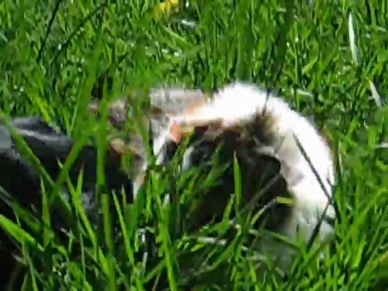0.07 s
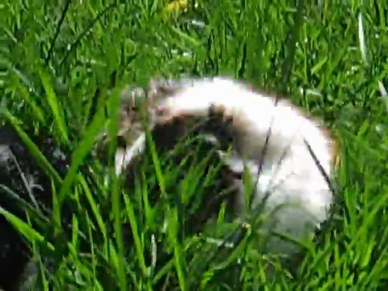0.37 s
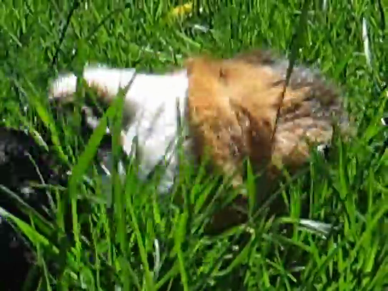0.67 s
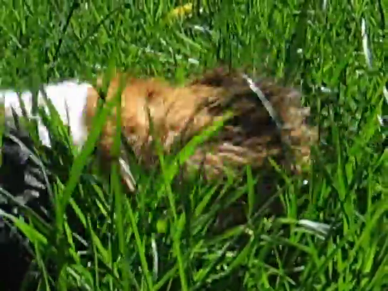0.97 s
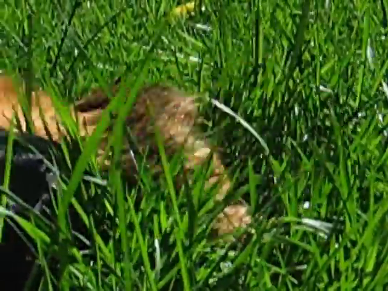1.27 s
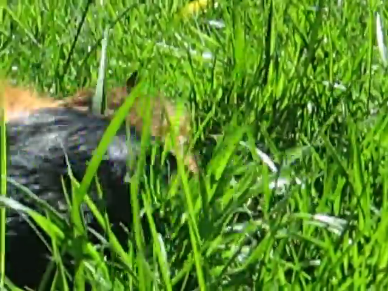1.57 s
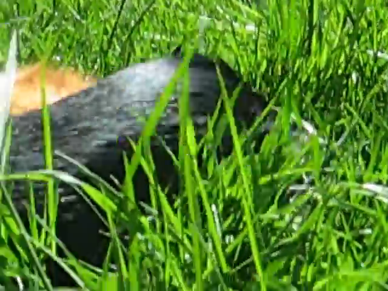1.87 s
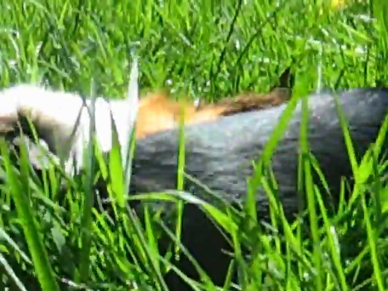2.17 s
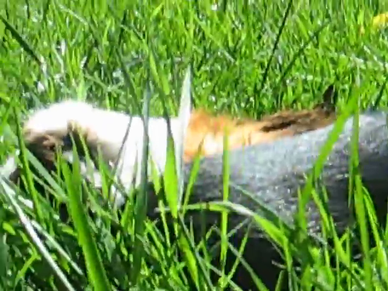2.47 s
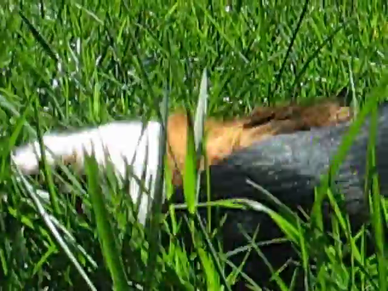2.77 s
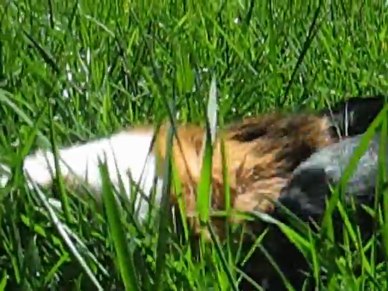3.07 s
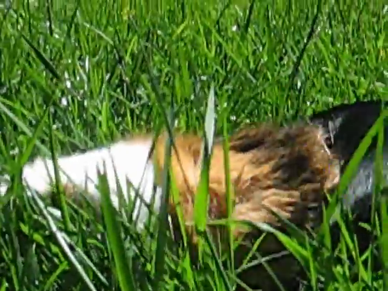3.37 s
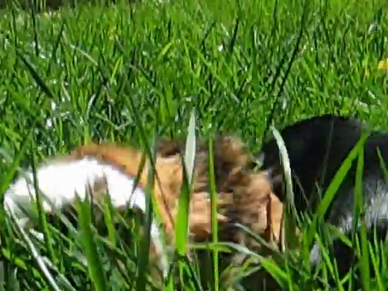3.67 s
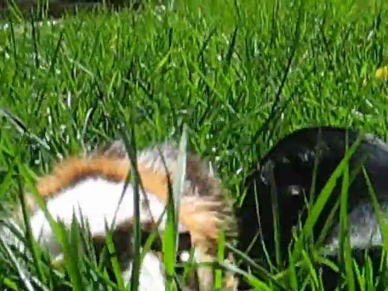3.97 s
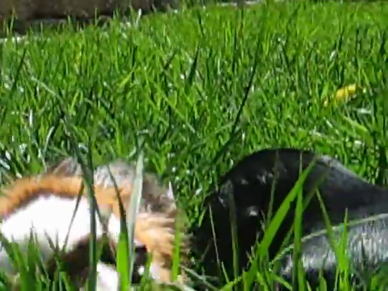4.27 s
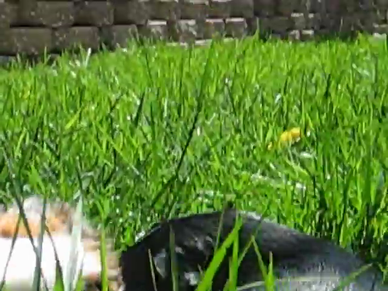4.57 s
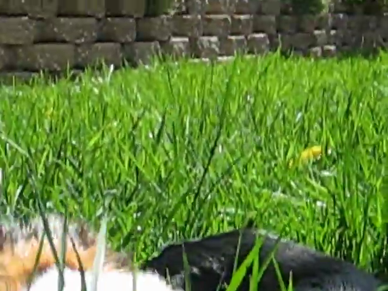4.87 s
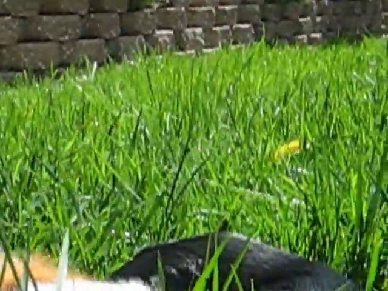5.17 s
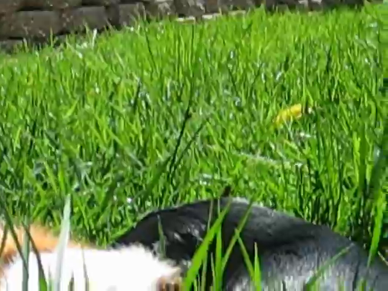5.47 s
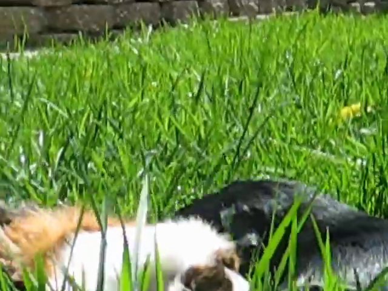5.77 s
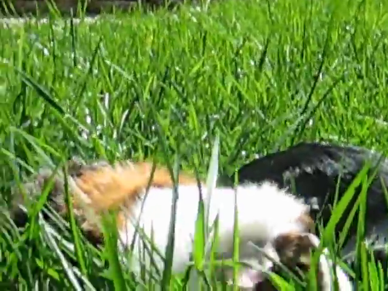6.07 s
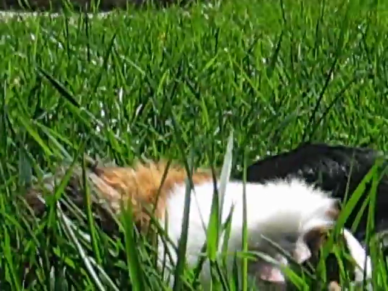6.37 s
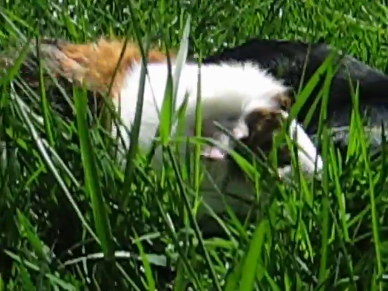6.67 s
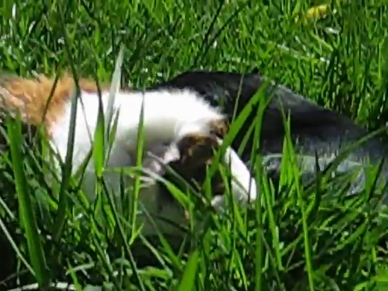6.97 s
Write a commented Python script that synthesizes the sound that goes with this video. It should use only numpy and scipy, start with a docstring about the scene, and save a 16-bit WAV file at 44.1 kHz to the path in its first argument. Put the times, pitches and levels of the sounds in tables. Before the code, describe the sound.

Guinea pigs move through long grass close to the microphone, making soft, short chuts in the first half and tiny rising squeaks throughout. Blades rustle and sometimes snap, while gusts and handling bumps rumble on the microphone. A distant bird whistles faintly at the start and again later. Near the end something rubs close by, and one hard knock on the camera stands out as the loudest sound.

```python
"""Guinea pigs in long grass, close to the microphone of a small, faintly whining camera, in gusty wind.
At first a distant bird whistles twice, echoing off a garden wall, and a low hum dies away by 2 s.
Up close the animals voice soft arched chuts until about 3.7 s and quick upward squeaks throughout;
blades rustle and snap as they push through, and the camera is bumped in the hand. From 5 s the bird
calls again, something rubs close by the microphone, and at 6.4 s a hard knock rings the camera case."""
import sys
import numpy as np
from scipy import signal
from scipy.fft import rfft, irfft
from scipy.io import wavfile

SR = 44100
rng = np.random.default_rng(int(sys.argv[2]) if len(sys.argv) > 2 else 0)


def pcm_store(signal):
    """Save signal as 16-bit PCM."""
    levels = np.round(np.clip(np.atleast_2d(signal), -1, 1) * 32767)
    wavfile.write(sys.argv[1], SR, levels.astype(np.int16).T)


N = 313551
T = np.arange(N) / SR
FLICK_HZ, FLICK_S = 1376, .019  # calls close with a flick toward this pitch; its full length in a chut

# close chuts: (time [s], arch length [s], crest pitch [Hz], voiced share of the flick [0-1],
# relative level [dB], nasal edge [dB])
CHUTS = [(0.771, .016, 617, 0.06, -41, -3), (1.072, .034, 562, 1, -39.5, 0),
         (1.230, 0.03, 582, 1, -36.5, 1), (1.399, 0.037, 574, 0.64, -39.5, 6),
         (1.583, 0.026, 541, 0.95, -41.5, -8), (1.796, 0.031, 587, 1, -44.5, -9),
         (1.995, 0.028, 514, 1, -40.5, 3), (2.077, 0.035, 591, 0.97, -34.5, 1),
         (2.171, 0.012, 493, 0, -34, -14), (2.241, 0.047, 614, 0.88, -34.5, 1),
         (2.52, 0.022, 454, 1, -39.5, -11), (2.581, 0.046, 601, 0.77, -35, -0.5),
         (2.733, .049, 621, 1, -34, -14), (2.909, .046, 640, 0.65, -35, -4),
         (3.222, 0.036, 672, .7, -44, -16), (3.477, 0.036, 629, 0.8, -35.5, 1.5),
         (3.624, 0.04, 574, 0.95, -36, 5)]
# close squeaks: (time [s], length [s], start pitch [Hz], relative level [dB], nasal edge [dB])
SQUEAKS = [(.002, 0.015, 610, -40.5, 8), (0.339, 0.024, 476, -33.5, 1), (0.561, 0.019, 570, -46, 4),
           (0.649, 0.014, 647, -43, 5), (0.793, 0.02, 586, -35, 2.5), (.942, .019, 578, -44, 0),
           (1.675, 0.043, 708, -43.5, -16), (1.876, 0.042, 786, -38, 3), (3.058, 0.028, 697, -44, -7),
           (3.343, 0.016, 658, -38, -5), (3.433, 0.019, 415, -38, -4), (3.819, 0.034, 414, -43.5, 0),
           (4.284, 0.0139, 800, -33, 5.5), (4.35, 0.011, 783, -36.5, 7), (4.705, 0.012, 905, -38.5, -5),
           (5.047, .015, 800, -40, 4), (5.702, 0.018, 627, -42.5, -4), (6.015, 0.021, 587, -34, -10),
           (6.847, 0.021, 730, -37, -5)]
# resonances of throat and nose: (frequency [Hz], gain [dB])
THROAT = [(300, 5), (600, -4.5), (900, -3), (1220, -2), (1450, -11.5), (1750, -25), (2100, -22.5),
          (2450, -13.5), (2900, -13), (3300, -21), (4500, -34.5)]
# soft clucks and pats in the grass: (time [s], level [dB])
PATS = [(.339, -27), (.490, -29), (.535, -32), (.800, -27.5), (.928, -32), (1.237, -40.5), (2.177, -29),
        (2.240, -38), (2.327, -34), (3.484, -32), (4.321, -27.5), (4.333, -36), (4.388, -28.5),
        (4.411, -32.5), (6.949, -25)]
# blades snapping: (time [s], peak level [dB])
SNAPS = [(1.9689, -33), (3.1708, -28), (3.644, -27), (3.686, -21.5), (5.142, -32), (5.158, -32.5)]
# an animal pushes through the blades: (time [s], length [s], level [dB])
PUSHES = [(0, 0.19, -50), (.37, 0.39, -46.5), (.9, 0.11, -48), (1.44, 0.37, -48.5), (1.84, 0.35, -49),
          (2.63, 0.17, -48), (2.8, 0.22, -51.5), (3.14, 0.15, -49), (3.65, .19, -48), (4.7, 0.066, -50.5),
          (5.12, .45, -48), (5.65, 0.27, -52), (6.48, 0.06, -51), (6.75, 0.13, -51)]
# something rubs close by the microphone: (time [s], length [s], level [dB])
RUBS = [(4.78, 1.7, -51.5), (5.99, 0.43, -39.5), (6.11, 0.14, -37.5), (6.48, 0.097, -35),
        (6.66, 0.042, -39), (6.77, 0.064, -36.5), (6.88, .1, -40.5)]
# dull brushing of grass: (frequency [Hz], gain [dB])
BRUSH_SPECTRUM = [(150, -4.5), (300, 7.5), (600, 2), (1050, 1.5), (1600, -3), (2200, -7.5), (3200, -15.5),
                  (4500, -21), (6000, -36)]
# fine rustle of grass: (frequency [Hz], gain [dB])
RUSTLE_SPECTRUM = [(800, -18), (1800, -5), (2400, -3.5), (3100, 0), (3800, -2), (4500, -1), (5200, -2),
                   (5900, -15.5)]
# a knock and soft finger taps on the camera: (time [s], relative level [dB], contact time [s])
KNOCKS = [(1.548, -18.5, 0.00056), (4.151, -19.5, 0.00085), (4.551, -19.5, 0.00054), (6.3921, -0.5, .00005),
          (6.43, -13, 0.00072), (6.4809, -7.5, 0.0008)]
# modes of the camera case: (frequency [Hz], gain [dB], t60 [s])
CASE_MODES = [(436, -23, 0.062), (705, -17, 0.034), (920, -15, 0.032), (1106, -13.5, 0.031),
              (1400, -13.5, 0.02), (1724, -3.5, 0.009), (3160, -9, 0.011), (3740, -5.5, 0.0073),
              (4460, -2.5, 0.0095), (4780, -4, 0.0041)]
# bumps through the camera body: (time [s], length [s], frequency [Hz], level [dB])
BUMPS = [(1.86, 0.26, 177, -36.5), (1.867, 0.2, 56.5, -21), (3.418, 0.03, 74.6, -17),
         (3.638, 0.086, 118, -25), (4.41, 0.062, 34, -17), (5.902, 0.034, 62.7, -13.5),
         (6.48, 0.0074, 187, -10.5)]
# gusts on the microphone: (time [s], length [s], level [dB])
GUSTS = [(0, 0.65, -37), (1.76, 0.4, -29.5), (3.93, .66, -32.5), (4.7, 0.42, -35.5), (5.2, 0.44, -43),
         (5.58, 0.47, -32), (5.89, .66, -29), (6.6, 0.25, -37), (6.94, 0.094, -30.5)]
# wind buffeting the microphone: (frequency [Hz], gain [dB])
BUFFET_SPECTRUM = [(20, -18.5), (45, -3), (70, -0.5), (100, -6), (150, -13.5), (220, -22), (350, -28.5),
                   (700, -47.5)]
# strength of the wind's slow sway: (time [s], relative level [dB])
SWAY_LEVEL = [(0, -32), (.8, -28.5), (1.1, -34.5), (1.6, -29.5), (2.4, -21.5), (2.65, -29), (2.9, -25),
              (3.2, -31), (3.85, -32), (4.45, -26.5), (4.93, -31), (5.17, -21.5), (5.35, -25.5),
              (5.68, -26.5), (5.9, -22.5), (6.6, -21), (7.0, -27)]
# rumble of that sway: (frequency [Hz], gain [dB])
SWAY_SPECTRUM = [(3, -9.5), (7, 3), (12, 7), (20, -3.5), (35, 3), (50, -16.5), (80, -53.5)]
# hush of open air: (frequency [Hz], gain [dB])
AIR_SPECTRUM = [(59, -24), (100, -5.5), (178, -9), (297, -12.5), (403, -21.5), (576, -23), (823, -21),
                (1030, -33), (1390, -26.5), (1960, -30), (2940, -27.5), (4900, -30.5), (5810, -45.5),
                (7550, -66), (12800, -120)]
# distant bird: (time [s], length [s], held pitch [Hz], relative level [dB])
WHISTLES = [(0.134, 0.092, 4610, -51), (0.437, 0.035, 4600, -47.5), (5.141, 0.1, 4680, -51),
            (5.425, 0.15, 4660, -49), (5.718, 0.089, 4660, -48), (6.01, 0.088, 4630, -48.5),
            (6.258, 0.077, 4590, -49)]
# low background hum: (time [s], pitch [Hz], level [dB])
HUM = [(0, 49.07, -33), (.6, 48.7, -31), (1.1, 48.6, -32), (1.6, 46.07, -33), (1.8, 45.6, -53),
       (2.0, 47.3, -90)]
# harmonics of the hum: (multiple of the pitch, gain [dB])
HUM_HARMONICS = [(1, 0), (2, -10), (4, -19)]
# tones of the camera's works: (frequency [Hz], rms level [dB])
WHINE = [(292, -58.5), (353, -60.5), (1411, -60), (1764, -66), (2094, -66), (3014, -64), (5512, -72)]


def chuts(rise_share=.6, onset_ratio=.55, dip_ratio=.82, onset_db=-9, dip_db=-5, gain_db=1):
    """A guinea pig near the microphone: the pitch arches, sags, then flicks up as the call closes."""
    out = np.zeros(N)
    for s, arch_s, crest_hz, voiced, db, nasal_db in CHUTS:
        marks = [0, rise_share * arch_s, arch_s, arch_s + FLICK_S]
        t = np.arange(0, arch_s + voiced * FLICK_S, 1 / SR)
        rise, sag, flick = (np.interp(t, span, [0, 1]) for span in zip(marks, marks[1:]))
        dip_hz = dip_ratio * crest_hz
        arch_hz = crest_hz * (1 - (1 - onset_ratio) * (1 - rise) ** 2)
        hz = arch_hz + (dip_hz - crest_hz) * sag ** 2 + (FLICK_HZ - dip_hz) * flick ** 2
        effort = np.interp(t, marks, undb([onset_db, 0, dip_db, 0])) * signal.windows.tukey(len(t), .1)
        add(out, s, voice(hz, effort, nasal_db) * undb(db + gain_db))
    return out


def squeaks(hz_per_db=22.5, usual_db=-39.5, gain_db=3):
    """The closing flick alone: one fast, swelling glide that stops short; louder ones climb higher."""
    out = np.zeros(N)
    for s, length, start_hz, db, nasal_db in SQUEAKS:
        progress = np.linspace(0, 1, int(length * SR))
        end_hz = FLICK_HZ + hz_per_db * (db - usual_db)
        hz = start_hz + (end_hz - start_hz) * progress ** 1.5
        swell = np.interp(progress, [0, .7, 1], [.3, 1, .8]) * signal.windows.tukey(len(hz), .25)
        add(out, s, voice(hz, swell, nasal_db) * undb(db + gain_db))
    return out


def voice(hz, envelope, nasal_db, jitter=.02, shimmer_db=2.5):
    """Slightly unsteady vocal folds; their harmonics glide through the fixed throat resonances."""
    wobble, flutter = (unit(band(rng.standard_normal(len(hz)), 30, 270)) for _ in range(2))
    phase = 2 * np.pi * np.cumsum(hz * (1 + jitter * wobble)) / SR
    k = np.arange(1, 9)[:, None]
    nasal = np.clip((k * hz - 1700) / 700, 0, 1)  # the nasal edge acts above 1700 Hz
    harmonics = response(k * hz, THROAT) * undb(nasal_db * nasal) * np.sin(k * phase)
    return harmonics.sum(axis=0) * envelope * undb(shimmer_db * flutter)


def pats(centre_hz=920, t60=.032, thud_hz=170, thud_db=-4, thud_t60=.02):
    """Short dull clucks down in the grass, each over a small low thud."""
    out, t = np.zeros(N), T[:SR // 20]
    thud = np.sin(2 * np.pi * thud_hz * t) * undb(thud_db - 60 * t / thud_t60)
    for s, db in PATS:
        cluck = band(noise_burst(t, t60), centre_hz * .55, centre_hz * 1.45)
        add(out, s, undb(db) * (cluck / np.abs(cluck).max() + thud))
    return out


def snaps(t60=.0065):
    """A nearby blade gives way with a bright tick."""
    out, t = np.zeros(N), T[:SR // 40]
    for s, db in SNAPS:
        tick = band(noise_burst(t, t60), 2600, 4900)
        add(out, s, undb(db) * tick / np.abs(tick).max())
    return out


def grass(grains_per_s=2500, grain_db=2, patchy_db=1.5, idle_brush_db=-51, idle_rustle_db=-55):
    """Blades slip over fur and camera in tiny grains: pushes mostly rustle, close rubs mostly brush."""
    push = swells(PUSHES, attack_s=.034, release_s=.064)
    rub = swells(RUBS, attack_s=.016, release_s=.068)
    brush = np.sqrt(undb(idle_brush_db) ** 2 + rub ** 2 + (undb(-6) * push) ** 2)
    rustle = np.sqrt(undb(idle_rustle_db) ** 2 + push ** 2 + (undb(-13) * rub) ** 2)
    out = np.zeros(N)
    for gain, spectrum in ((brush, BRUSH_SPECTRUM), (rustle, RUSTLE_SPECTRUM)):
        slips = (rng.random(N) < grains_per_s / SR) * rng.choice([-1, 1], N)
        sizes = undb(grain_db * np.minimum(rng.exponential(size=N), 6))
        out += colour(slips * sizes, spectrum) * gain * undb(patchy_db * drift(35))
    return out


def knocks(attack_s=.00018):
    """Each contact rings the camera case; a soft finger pushes longer and leaves the high modes still."""
    out, t = np.zeros(N), T[:SR // 10]
    ring = sum((-1) ** k * np.sin(2 * np.pi * hz * t) * undb(db - 60 * t / t60)
               for k, (hz, db, t60) in enumerate(CASE_MODES))
    ring *= 1 - np.exp(-t / attack_s)
    for s, db, contact_s in KNOCKS:
        push = np.hanning(int(contact_s * SR) + 3)
        add(out, s, undb(db) * np.convolve(ring, push / push.sum()))
    return out


def bumps():
    """Handling noise reaches the microphone through the camera body as low rounded thumps."""
    out = np.zeros(N)
    for s, length, hz, db in BUMPS:
        t = np.arange(int(length * SR)) / SR
        add(out, s, undb(db) * np.hanning(len(t)) * np.sin(2 * np.pi * hz * t))
    return out


def wind(sway_gain_db=-1, breeze_db=-40.5, eddy_db=2.5, air_db=-43.5):
    """Eddies sway and buffet the microphone, harder in each gust, over the even hush of open air."""
    sway_db, = curves(SWAY_LEVEL)
    sway = colour(rng.standard_normal(N), SWAY_SPECTRUM) * undb(sway_db + sway_gain_db)
    strength = np.hypot(undb(breeze_db), swells(GUSTS, attack_s=.023, release_s=.13))
    eddies = colour(rng.standard_normal(N), BUFFET_SPECTRUM + [(3000, -72)])
    buffet = eddies * strength * undb(eddy_db * drift(20))
    hush = colour(rng.standard_normal(N), AIR_SPECTRUM) * undb(air_db + .58 * drift(2.2))
    return band(sway, 2, 98) + buffet + hush


def bird(scoop_hz=680, scoop_s=.02, echo_s=.037, echo_db=-1, tail_db=-9, tail_t60=.55, gain_db=2):
    """Far off, each whistle scoops up to a held note; the wall returns it and the garden smears it."""
    out = np.zeros(N)
    for s, length, held_hz, db in WHISTLES:
        t = np.arange(int(length * SR)) / SR
        hz = held_hz - scoop_hz * np.exp(-t / scoop_s)
        envelope = undb(db - 20 * t) * signal.windows.tukey(len(t), .1)
        note = envelope * np.sin(2 * np.pi * np.cumsum(hz) / SR)
        add(out, s, note)
        add(out, s + echo_s, undb(echo_db) * note)
    garden = noise_burst(T[:SR // 2], tail_t60)
    tail = signal.fftconvolve(out, garden / np.linalg.norm(garden))[:N]
    return undb(gain_db) * (out + undb(tail_db) * tail)


def hum(waver_db=2):
    """A low hum in the background sags in pitch and dies away."""
    hz, db = curves(HUM)
    phase = 2 * np.pi * np.cumsum(hz) / SR
    return np.sqrt(2) * sum(undb(db + harmonic_db + waver_db * drift(2.8)) * np.sin(k * phase)
                            for k, harmonic_db in HUM_HARMONICS)


def whine(wander_hz=1.56):
    """The microphone picks up thin, nearly steady tones from the camera's own works."""
    return np.sqrt(2) * sum(undb(db) * np.sin(2 * np.pi * np.cumsum(hz + wander_hz * drift(12)) / SR)
                            for hz, db in WHINE)


def undb(db):
    return 10 ** (np.asarray(db) / 20)


def unit(x):
    """Scale to rms 1."""
    return x / np.sqrt(np.mean(x ** 2) + 1e-18)


def curves(table):
    """Each column after the time column, joined by straight lines in time."""
    s, *columns = np.transpose(table)
    return [np.interp(T, s, column) for column in columns]


def swells(table, attack_s, release_s):
    """Gain of (time [s], length [s], level [dB]) events that rise, hold, fade; overlaps add in power."""
    power = np.zeros(N)
    for s, length, db in table:
        rise = np.clip((T - s) / attack_s, 0, 1)
        fade = np.clip(1 - (T - s - length) / release_s, 0, 1)
        power += (undb(db) * rise * fade) ** 2
    return np.sqrt(power)


def response(hz, spectrum):
    """Gain of a (frequency [Hz], gain [dB]) spectrum at the given frequencies."""
    points_hz, db = np.transpose(spectrum)
    return undb(np.interp(np.log(hz + 1e-9), np.log(points_hz), db))


def colour(x, spectrum):
    """Shape a signal by a spectrum, at rms 1."""
    hz = np.fft.rfftfreq(len(x), 1 / SR)
    return unit(irfft(rfft(x) * response(hz, spectrum), len(x)))


def band(x, lo_hz, hi_hz):
    """Causal band-pass."""
    return signal.sosfilt(signal.butter(2, [lo_hz, hi_hz], "band", fs=SR, output="sos"), x)


def noise_burst(t, t60):
    """White noise that falls 60 dB in t60 seconds."""
    return rng.standard_normal(len(t)) * undb(-60 * t / t60)


def drift(knots_per_s):
    """Slow random wander at rms 1."""
    knots = rng.standard_normal(4096)
    return unit(np.interp(T * knots_per_s, np.arange(len(knots)), knots))


def add(out, s, x):
    """Mix a short sound in at time s."""
    i = int(s * SR)
    out[i:i + len(x)] += x[:N - i]


def scene():
    """One microphone in the grass: animals close by, handling noise and wind on it, the bird far off."""
    animals = chuts() + squeaks() + pats() + snaps() + grass()
    garden = bird() + wind() + hum()
    camera = knocks() + bumps() + whine()
    return (animals + garden + camera)[None]


def record(dry, top_hz=5850, ceiling=.68, output_hz=16000):
    """The camera cuts the high treble; the knock overloads its output and splashes above that cut."""
    narrow = signal.sosfilt(signal.ellip(10, .2, 85, top_hz, fs=SR, output="sos"), dry)
    clipped = np.clip(narrow, -ceiling, ceiling)
    return signal.sosfilt(signal.ellip(8, .2, 70, output_hz, fs=SR, output="sos"), clipped)


dry = scene()
out = record(dry)
pcm_store(out)
```